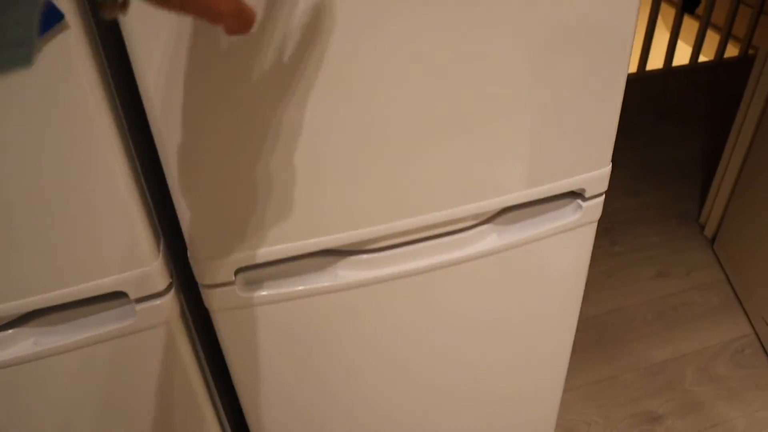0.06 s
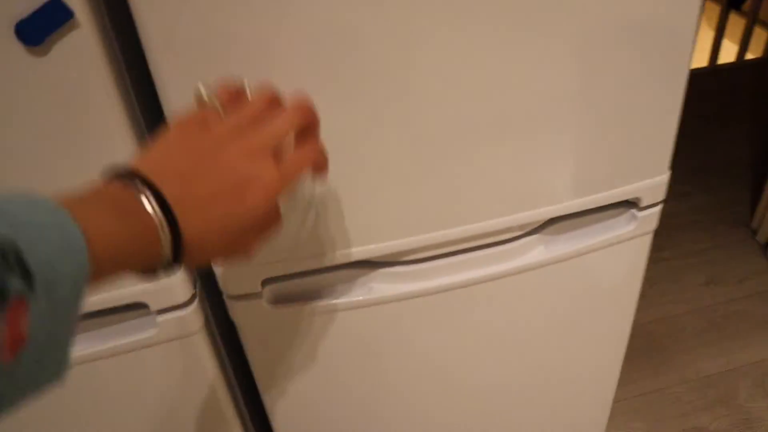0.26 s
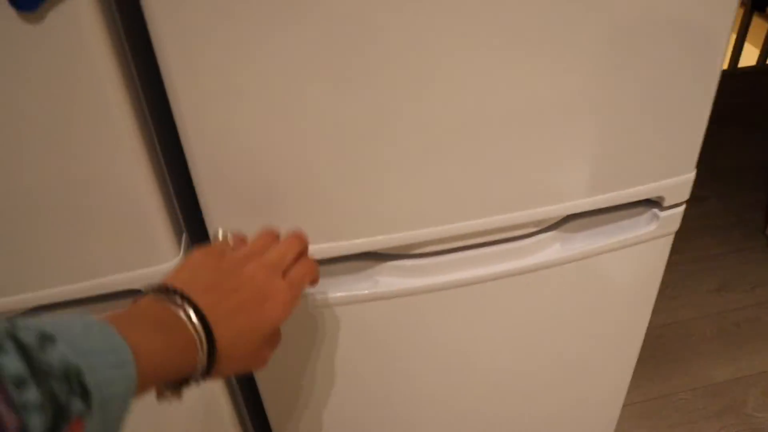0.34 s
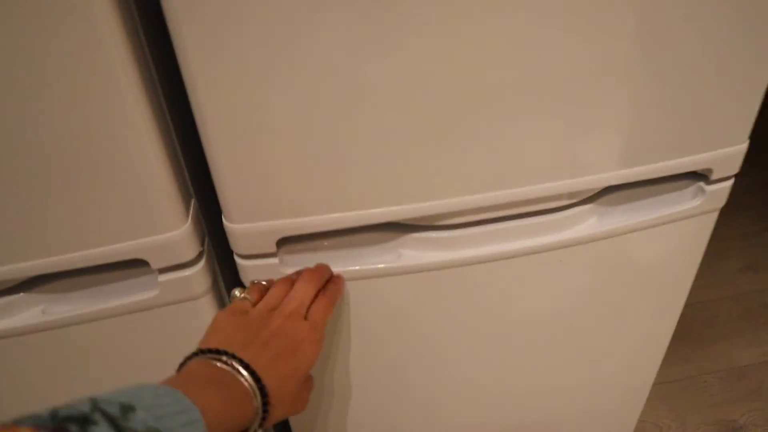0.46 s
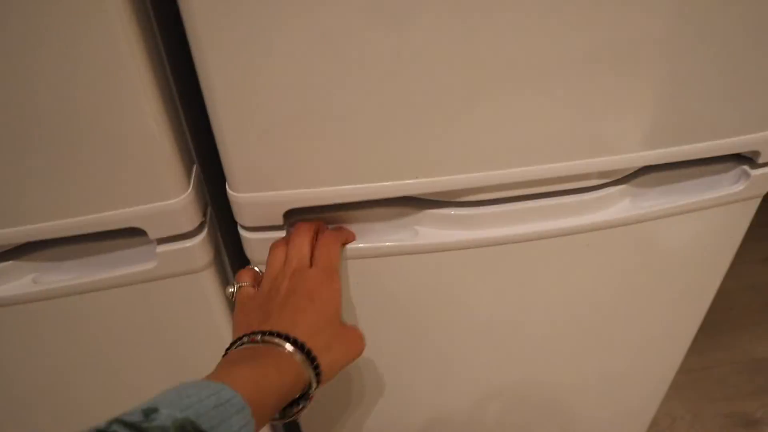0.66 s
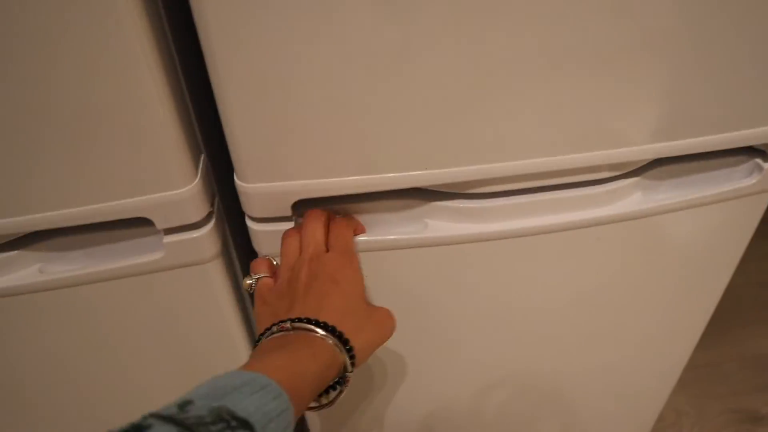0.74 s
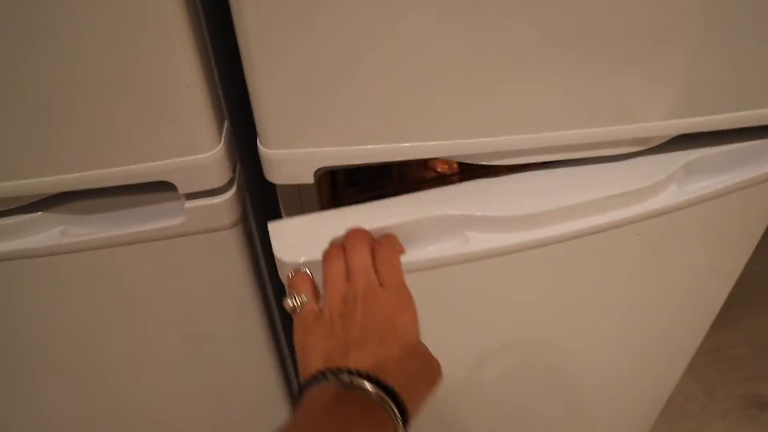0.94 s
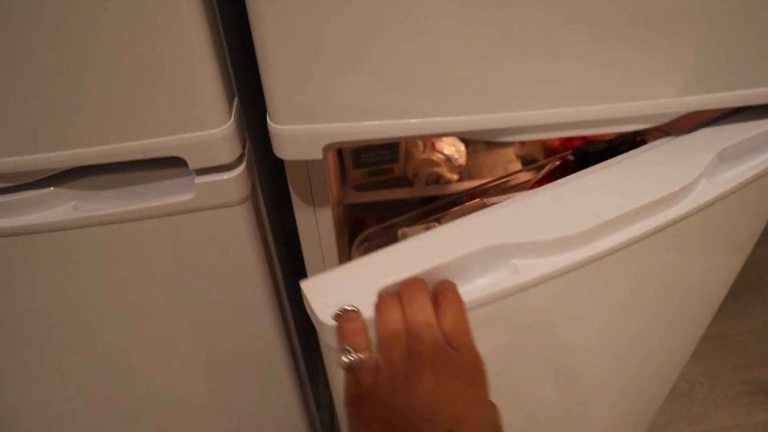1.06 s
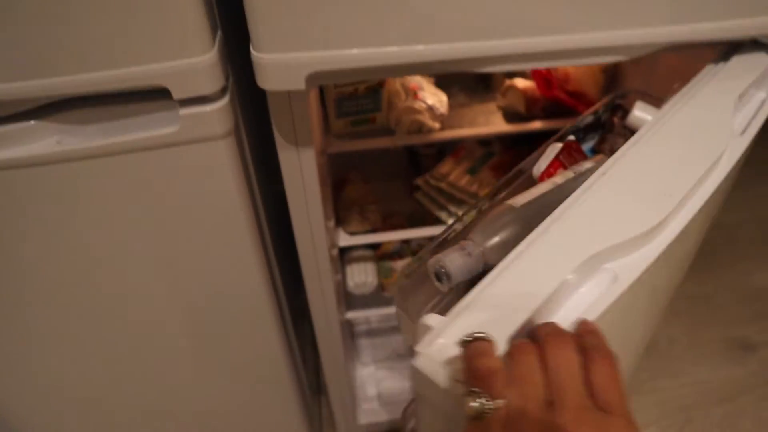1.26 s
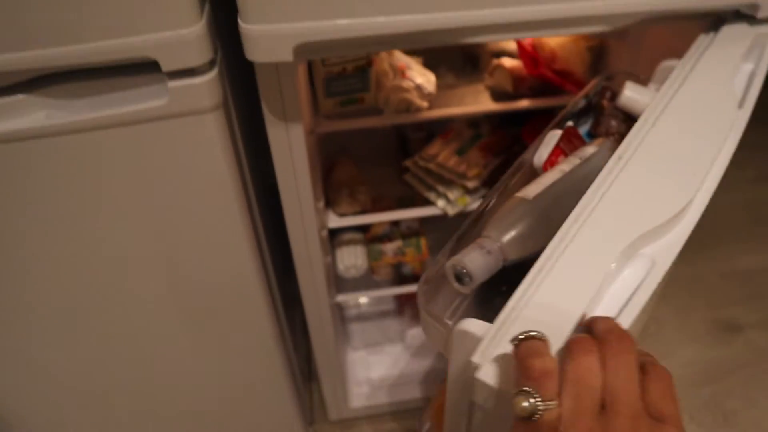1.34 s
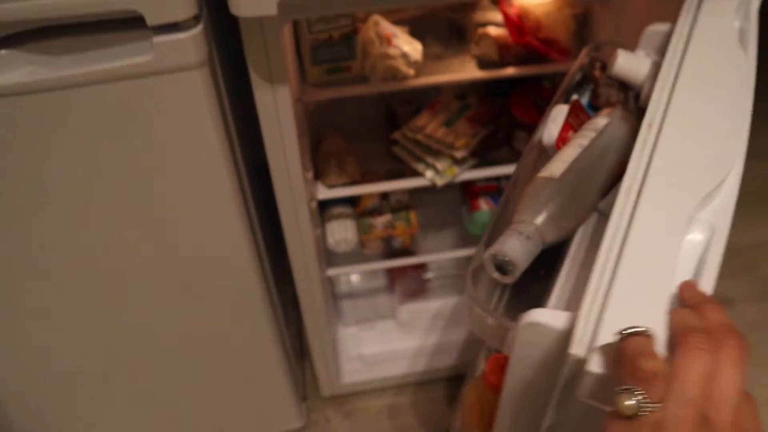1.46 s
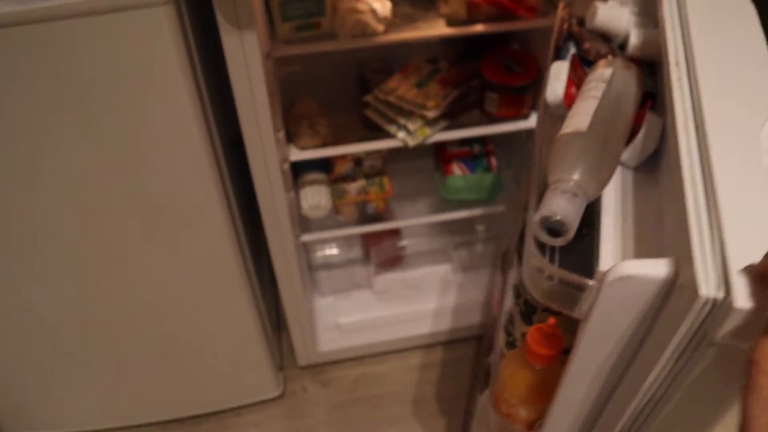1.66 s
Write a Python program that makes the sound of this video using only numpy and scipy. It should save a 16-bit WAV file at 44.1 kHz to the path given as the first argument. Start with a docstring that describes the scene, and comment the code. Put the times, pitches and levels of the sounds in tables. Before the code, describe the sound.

Close stereo microphone in a small, slightly echoing kitchen: a hard fridge door slam that overloads briefly, light clicks and a short squeaky handle groan, then the seal releases and the door opens with hollow clunks and rattles.

```python
"""A fridge door is slapped shut, a hand grips the plastic handle of the door below, the rubber seal peels,
and the door swings open with bottles knocking in its shelves, in a small kitchen heard from close by.
Knocks and ticks are noise bursts with ringing tones, the slipping hand is squeaks and a train of tiny slips,
the shaking is thousands of random clicks, and the booms are low sine tones. Soft noise lies underneath."""
import sys
import numpy as np
from scipy import signal
from scipy.fft import rfft, irfft
from scipy.io import wavfile
from scipy.ndimage import uniform_filter1d

SR = 44100
rng = np.random.default_rng(int(sys.argv[2]) if len(sys.argv) > 2 else 0)


def wav_out(sig):
    """Save sig, one row per channel (or a flat mono array), as 16-bit PCM at SR to the path in sys.argv[1]."""
    wavfile.write(sys.argv[1], SR, np.round(np.clip(np.atleast_2d(sig).T, -1, 1) * 32767).astype(np.int16))


N = 74970  # length in samples, 1.7 s
KNOCK_RISE_S = 0.00088  # time a knock or grip takes to reach full strength


def amp(db):
    """Turn decibels into a plain multiplier."""
    return 10 ** (np.asarray(db) / 20)


def evened(x):
    """Scale a sound to an average (RMS) strength of 1."""
    return x / np.sqrt(np.mean(x ** 2) + 1e-20)


def read(points, hz):
    """Read a (frequency, value) curve at any frequency, on a logarithmic pitch scale."""
    f, value = np.transpose(points)
    return np.interp(np.log(hz + 1), np.log(f + 1), value)


def columns(table):
    """Draw straight lines through each column of a time table, sample by sample."""
    rows = np.transpose(table)
    return [np.interp(np.arange(N) / SR, rows[0], c) for c in rows[1:]]


def span(table):
    """A gate that opens for the length of a time table, with short fades."""
    start, end = table[0][0], table[-1][0]
    return columns([(start - .004, 0), (start, 1), (end, 1), (end + .03, 0)])[0]


def add(mix, s, sound):
    """Add a sound into the mix at time s, cutting off what runs past the end."""
    part = mix[round(s * SR):][:len(sound)]
    part += sound[:len(part)]


def colour(x, points):
    """Shape the balance of low and high frequencies, then even the strength."""
    gain = amp(read(points, np.fft.rfftfreq(x.shape[-1], 1 / SR)))
    return evened(irfft(rfft(x) * gain, x.shape[-1]))


def band(x, lo_hz, hi_hz):
    """Keep one frequency band and scale its peak to 1."""
    y = signal.sosfilt(signal.butter(2, [lo_hz, hi_hz], "band", fs=SR, output="sos"), x)
    return y / abs(y).max()


def resonate(x, hz, width_hz):
    """A resonance whose pitch may glide: shift it to zero, smooth, shift it back."""
    turn = np.exp(2j * np.pi * np.cumsum(hz * np.ones(len(x))) / SR)
    r = np.exp(-np.pi * width_hz / SR)
    return 2 * (turn * signal.lfilter([1 - r], [1, -r], x / turn)).real


def ring(modes, t, shift=1):
    """A struck object sounds as a sum of sine tones, each dying away at its own speed."""
    longest_s = .13  # every ringing tone is kept short: no 60 dB decay lasts longer
    return sum(amp(db - 60 * t / min(t60, longest_s)) * np.sin(2 * np.pi * hz * shift * t)
               for hz, db, t60 in modes)


def hum():
    """Steady kitchen background: shaped noise, a low narrow drone, and a soft rustle swelling at the end."""
    # Balance of the background noise: f/Hz, relative level/dB
    hum_curve = [(15, -38), (25, 2), (181, 1.5), (335, -9), (558, -9), (621, -11), (952, -12),
                 (1030, -17.5), (1120, -15.5), (1460, -18), (1960, -23.5), (2700, -21.5), (3630, -28.5),
                 (11500, -41), (15000, -46)]
    hum_db, drone_db, rustle_db = -40.5, -58, -44.5
    drone_hz, drone_width_hz = 169, 9
    rustle_hz, rustle_width_hz = 1670, 670
    rustle_s, rustle_rise_s = 1.737, 0.097  # centre and width of the swell
    rustle = resonate(rng.standard_normal(2 * N), rustle_hz, rustle_width_hz).reshape(2, N)
    swell = np.exp(-((np.arange(N) / SR - rustle_s) / rustle_rise_s) ** 2)
    drone = amp(drone_db) * evened(resonate(rng.standard_normal(N), drone_hz, drone_width_hz))
    background = amp(hum_db) * colour(rng.standard_normal((2, N)), hum_curve)
    return drone + background + amp(rustle_db) * swell * evened(rustle)


def ticks():
    """Each tick is a dry noise click around its pitch; the gripping fingers ring the hollow handle."""
    # Ticks of nails, bangles and plastic, and at 0.293 the rebound of the slammed door:
    # t/s, level/dB, middle of the band f/Hz, relative edge level/dB
    tick_table = [(0.0437, -35.5, 1610, -5), (0.1572, -26, 2040, -20), (0.293, -14.5, 2010, -3.5),
                  (0.578, -40, 1440, -9), (0.6139, -23.5, 2800, -5), (0.7017, -36, 2350, -2),
                  (0.7116, -22.5, 2340, -16), (0.7374, -30, 2500, -22), (0.7533, -28.5, 2600, -7.5),
                  (0.8193, -32.5, 2900, -4), (0.844, -32, 2270, -11), (0.8838, -30.5, 1880, -4.5),
                  (0.8905, -23.5, 2150, -16), (0.9271, -19, 2340, -8), (1.4642, -30.5, 1510, -40),
                  (1.5896, -34.5, 3060, -18), (1.6324, -45, 4100, -20)]
    # Fingers landing on the handle: t/s, level/dB
    grips = [(.615, -20.5), (0.6226, -28.5)]
    # Tones of the handle: f/Hz, level/dB, time to fall 60 dB/s
    handle = [(1323, 0.5, 0.047), (1236, 6, 0.029), (841, -4.5, 0.086), (2390, -3, 0.027),
              (2700, -1.5, 0.019)]
    fade_s, spread = 0.0022, 1.5  # spread: each band reaches from pitch / spread to pitch * spread
    out, t = np.zeros(N), np.arange(SR // 5) / SR
    for s, db, hz, edge_db in tick_table:
        burst = rng.standard_normal(len(t)) * np.exp(-t / fade_s)
        edge = amp(edge_db) * band(burst, 2300, 10000)
        add(out, s, amp(db) * (band(burst, hz / spread, hz * spread) + edge))
    for s, db in grips:
        add(out, s, amp(db) * np.minimum(t / KNOCK_RISE_S, 1) * ring(handle, t))
    return out


def knocks():
    """A low push, a short crack in three bands, a hollow note, and the ringing of what was hit."""
    # Knocks on cabinet and door: t/s, level/dB, then relative to it thump/dB, body/dB, edge/dB, ringing/dB,
    # hollow note f/Hz, note/dB
    knock_table = [(0.2001, -7.5, -9, 0.5, -38, -7, 1863, -1.5),
                   (0.2028, 3, -22, -0.5, -4.5, -18, 426, -8.5),
                   (0.9844, -28, 16.5, 20.5, -20, -2, 385, 23), (1.0034, -30, -7, -13, -24, 2, 238, 23),
                   (1.0425, -19, -20, -30, 0, -12.5, 480, -5),
                   (1.0905, -34.5, -19, 15.5, 3, -13, 460, 17.5), (1.157, -32, 10, 8, -12, 4.5, 438, 23),
                   (1.19, -43, 20, -2, -25, 20.5, 460, 20)]
    # Tones of the shut cabinet: f/Hz, level/dB, time to fall 60 dB/s (before the limit in ring)
    shut_modes = [(64.6, -8, 2.2), (153, 5, 0.31), (422, -8, 0.77), (607, -2.5, 0.15), (759, -2.5, 0.56),
                  (1025, -19, 0.93), (1383, -20, 0.15)]
    # Tones of the open door with bottles: f/Hz, level/dB, time to fall 60 dB/s (before the limit in ring)
    open_modes = [(108.5, 6.5, 0.41), (236.4, 12, 0.39), (387, -23, 0.53), (477, 3, 0.34), (573, 1.5, 0.35),
                  (753, -8, 0.27), (817, -8.5, 0.48), (1012, -9.5, 0.48), (1110, -22, 0.63)]
    fade_s, thump_hz, note_t60_s = 0.0043, 177, 0.03
    swing_s, detune = .6, .04  # when the open door takes over; each blow finds the tones slightly shifted
    slam_s, slam_hz, slam_db, slam_fade_s = .2016, 209, 0, 0.0049
    out, t = np.zeros(N), np.arange(SR // 2) / SR
    for s, db, thump_db, body_db, edge_db, ring_db, note_hz, note_db in knock_table:
        burst = rng.standard_normal(len(t)) * np.exp(-t / fade_s)
        short_burst = burst * np.exp(-t / fade_s)  # fades twice as fast
        push = np.sin(2 * np.pi * thump_hz * t) * np.exp(-t * thump_hz / 2)
        crack = band(short_burst, 1720, 6000)
        crack = crack + amp(body_db) * band(burst, 263, 1820)
        crack = crack + amp(edge_db) * band(short_burst, 4800, 14000)
        modes = shut_modes if s < swing_s else open_modes
        ringing = ring(modes, t, 1 + detune * rng.uniform(-0.9, 1))
        note = ring([(note_hz, note_db, note_t60_s)], t)
        blow = crack - amp(thump_db) * push + amp(ring_db) * ringing + note
        add(out, s, amp(db) * np.minimum(t / KNOCK_RISE_S, 1) * blow)
    # air pushed out by the shutting door
    air = np.sin(2 * np.pi * slam_hz * t) * np.exp(-(t / slam_fade_s) ** 2 / 2)
    add(out, slam_s, amp(slam_db) * air)
    return out


def shake():
    """Contents and panels shake and the seal tears loose: dense rattles of uneven size, dull and bright."""
    # Strength of the shaking: t/s, dull level/dB, bright level/dB
    shake_table = [(0.2, -16.5, -33), (0.205, -21, -7.5), (0.216, -20, -48), (0.238, -16, -49),
                   (0.286, -18, -23.5), (0.29, -18, -21), (0.498, -40.5, -57.5), (0.568, -74, -87),
                   (0.582, -36, -49), (0.6, -99, -103), (0.616, -34.5, -56), (0.628, -27.5, -63),
                   (0.652, -45, -40), (0.752, -42, -45), (0.79, -55, -44), (0.92, -35, -53),
                   (0.926, -33.5, -29), (0.94, -21.5, -28.5), (0.978, -28.5, -54), (0.988, -13, -24.5),
                   (1.034, -21, -66), (1.042, -17.5, -24.5), (1.086, -28, -36.5), (1.094, -20.5, -30.5),
                   (1.126, -30, -39.5), (1.146, -27.5, -44), (1.16, -14.5, -48), (1.358, -45.5, -62),
                   (1.438, -61, -67), (1.45, -49, -48.5)]
    # Dull rattle of the shut cabinet: f/Hz, relative level/dB
    shut_curve = [(65, -38), (110, -5.5), (232, -1), (321, -2.5), (393, 0.5), (466, -3), (754, -2.5),
                  (1080, -5), (2010, -14), (3100, -24.5), (4500, -24), (5850, -41), (9900, -120)]
    # Dull rattle of the open door: f/Hz, relative level/dB
    open_curve = [(65, -24), (110, -3), (254, -4), (358, -3), (481, -4), (598, -12), (754, -3.5),
                  (923, -14.5), (1300, -16), (1800, -23.5), (2040, -21), (3050, -29), (4500, -37),
                  (5850, -43), (9900, -120)]
    # Bright rattle: f/Hz, relative level/dB
    bright_curve = [(880, -6), (1500, -1.5), (4720, -16), (7280, -24), (7940, -29.5), (11500, -25.5),
                    (15000, -85)]
    rattles_per_s, size_spread_db, release_s = 3000, 2.3, .98  # release: dull colour turns to the open door
    dull_db, bright_db = columns(shake_table)
    sizes = amp(size_spread_db * rng.exponential(1, (4, N)))
    hits = rng.random((4, N)) < rattles_per_s / SR
    clicks = sizes * hits * rng.choice([-1, 1], (4, N))
    # two unrelated draws for the dull part, two for the bright part
    still_shut = np.arange(N) < release_s * SR
    dull = np.where(still_shut, colour(clicks[:2], shut_curve), colour(clicks[:2], open_curve))
    bright = colour(clicks[2:], bright_curve)
    return span(shake_table) * (amp(dull_db) * dull + amp(bright_db) * bright)


def boom():
    """The lowest resonances of cabinet and door panel: two sine tones that rise and fall in strength."""
    # Strength of the two tones: t/s, cabinet level/dB, door panel level/dB
    boom_table = [(0.2, -23, -18), (0.224, -14, -18.5), (0.242, -19.5, -39), (0.318, -21, -48),
                  (0.362, -40, -62), (0.38, -32.5, -37), (0.464, -49, -43.5), (0.55, -77, -70),
                  (0.62, -35.5, -48), (0.732, -46.5, -75), (0.754, -45, -51), (0.926, -61, -48),
                  (0.97, -25.5, -54), (1.006, -33, -15.5), (1.042, -32, -52), (1.116, -48, -22),
                  (1.202, -39, -33.5), (1.268, -40.5, -32.5), (1.416, -45.5, -54), (1.5, -51, -59)]
    cabinet_hz, panel_hz = 63.2, 106.45
    t = np.arange(N) / SR
    tones = sum(amp(db) * np.sin(2 * np.pi * hz * t)
                for db, hz in zip(columns(boom_table), (cabinet_hz, panel_hz)))
    return span(boom_table) * np.sqrt(2) * tones


def slip():
    """Skin squeaks in fits at a wavering pitch and its half; uneven slips make the handle groan."""
    # Fingers slipping on the handle: t/s, squeak f/Hz, squeak level/dB, half-pitch level/dB, low rub level/dB
    slip_table = [(.62, 2736, -62, -32, -58), (.636, 2783, -64, -31, -52), (.643, 2699, -65, -52, -60),
                  (.65, 2742, -28, -48, -53), (.657, 2752, -52, -50, -63), (.664, 2664, -30.5, -51, -66),
                  (.678, 2664, -44, -42, -60), (.686, 2655, -58, -45, -58), (.698, 2507, -32.5, -54, -47),
                  (.712, 2450, -48, -60, -27.5), (.722, 2456, -59, -52, -31.5), (.745, 2388, -66, -71, -31),
                  (.754, 2330, -45, -59, -33), (.764, 2400, -39, -69, -33.5), (.774, 2550, -72, -61, -47),
                  (.79, 2420, -60, -60, -46)]
    # Tones of the creaking handle: f/Hz, level/dB, time to fall 60 dB/s
    groan_modes = [(265, -12, .06), (349, 3.5, 0.086), (428, -4, 0.041), (480, -9.5, 0.028),
                   (830, -10, 0.06)]
    # Share of clear tone, the rest being rough: squeak, half pitch [share of power]
    clear_shares = .65, .35
    width_hz, sticks_per_s, stick_depth_db = 260, 110, 2.5  # the skin catches and lets go
    groan_per_s, groan_jitter = 78, .08  # average slips a second, and how much that pace varies
    hz, squeak_db, half_db, rub_db = columns(slip_table)
    out, width = np.zeros(N), round(SR / sticks_per_s / 2)
    for db, f, share in zip((squeak_db, half_db), (hz, hz / 2), clear_shares):
        clear = np.sqrt(2) * np.sin(2 * np.pi * np.cumsum(f) / SR)
        narrow = resonate(rng.standard_normal(N), f, width_hz)
        rough = evened(resonate(narrow, f, 3 * width_hz))
        wobble = uniform_filter1d(uniform_filter1d(rng.standard_normal(N), width), width)
        fits = evened(amp(stick_depth_db * evened(wobble)))
        out = out + amp(db) * fits * (np.sqrt(share) * clear + np.sqrt(1 - share) * rough)
    drift = evened(uniform_filter1d(rng.standard_normal(N), size=400))
    pace = groan_per_s * (1 + groan_jitter * drift)
    # one pulse each time the running count of slips passes a whole number
    slips = np.diff(np.floor(np.cumsum(pace) / SR), prepend=0)
    groan = evened(signal.oaconvolve(slips, ring(groan_modes, np.arange(SR // 10) / SR))[:N])
    return span(slip_table) * (out + amp(rub_db) * groan)


def kitchen(x):
    """Room echo: two noise tails, each frequency band dying at its own speed."""
    # How long the room rings: f/Hz, time to fall 60 dB/s
    decay_curve = [(100, 0.24), (400, 0.58), (1500, 0.59), (5000, 0.51), (12000, 0.24)]
    echo_db = -8.5
    taps = rng.standard_normal((2, SR)) * (np.arange(SR) > 150)  # the echo starts a moment late
    hz, t, z = signal.stft(taps, SR, nperseg=256)
    fade = amp(-60 * t / read(decay_curve, hz)[:, None])
    tail = signal.istft(z * fade, SR, nperseg=256)[1]
    return amp(echo_db) * signal.fftconvolve(x[None], tail / np.linalg.norm(tail[0]), axes=1)[:, :N]


def scene():
    """Mix a mid signal, and a side signal partly tied to it, partly diffuse, into left and right."""
    # Strength of the side signal: f/Hz, side relative to mid/dB
    side_level = [(40, -22), (110, -29), (200, -17), (380, -11.5), (700, -6), (1290, -2.5), (2380, 2),
                  (4400, 4.5), (8120, 6.5), (15000, 13)]
    # How much of the side follows the mid: f/Hz, share
    side_tied = [(500, 0.034), (2000, 0.39), (5000, 0.53), (12000, 0.45)]
    # Phase of the tied part: f/Hz, lead of side over mid/radians
    side_turn = [(500, 1.7), (2000, 2), (12000, 1.33)]
    near = knocks() + ticks() + slip()
    # the direct sound and the boom join the mid; the diffuse side lacks them
    mid, other = kitchen(near) + shake() + hum() + (near + boom()) * [[1], [0]]
    hz = np.fft.rfftfreq(N, 1 / SR)
    tied = np.clip(read(side_tied, hz), 0, 1)
    following = tied * np.exp(1j * read(side_turn, hz)) * rfft(mid)
    diffuse = np.sqrt(1 - tied ** 2) * rfft(other)
    side = irfft(amp(read(side_level, hz)) * (following + diffuse), N)
    return np.array([mid + side, mid - side])


def record(dry):
    """Microphone colour, overload that cuts off the highest peaks, then a limit on the treble."""
    # Microphone response: f/Hz, level/dB
    mic_curve = [(15, -15), (40, -1.5), (56, -2.5), (12000, 0), (13500, -7), (16000, -45)]
    ceiling, edge_hz = 1.0, 16200
    heard = irfft(rfft(dry) * amp(read(mic_curve, np.fft.rfftfreq(N, 1 / SR))), N)
    lowpass = signal.firwin(511, edge_hz, window=("kaiser", 9), fs=SR)
    return signal.oaconvolve(np.clip(heard, -ceiling, ceiling), lowpass[None], "same")


dry = scene()
out = record(dry)
wav_out(out)
```